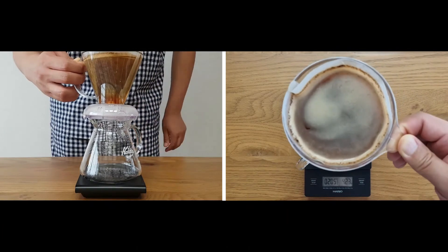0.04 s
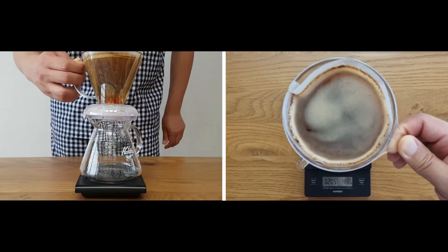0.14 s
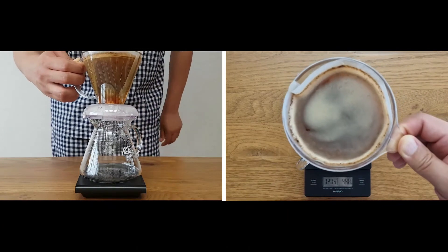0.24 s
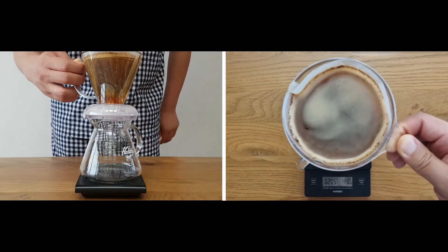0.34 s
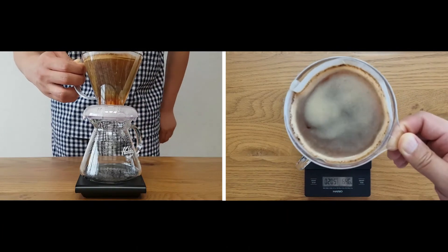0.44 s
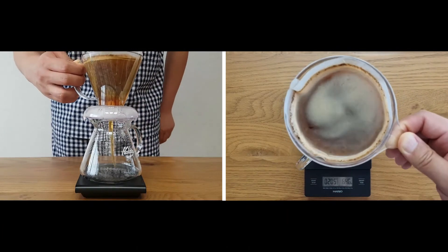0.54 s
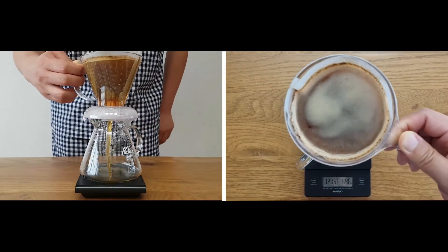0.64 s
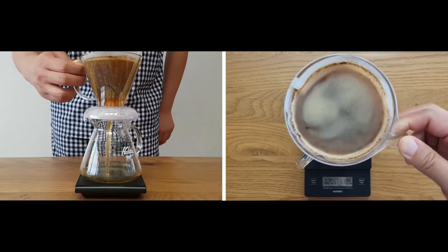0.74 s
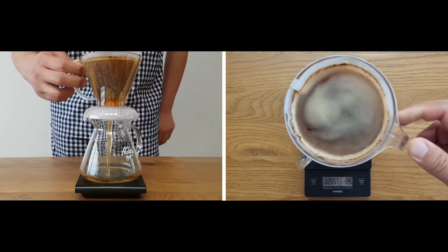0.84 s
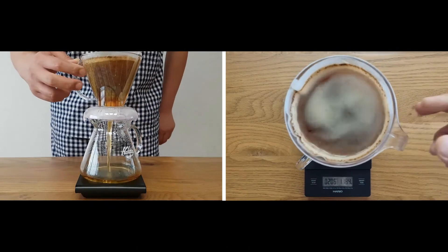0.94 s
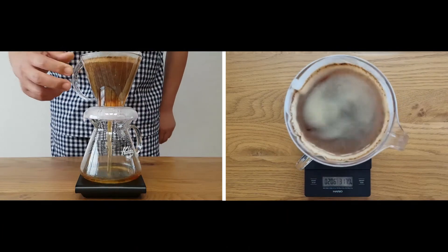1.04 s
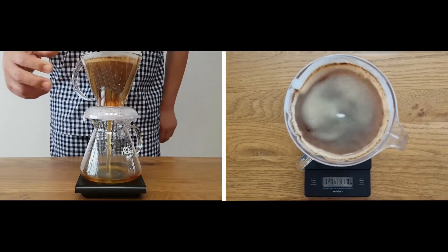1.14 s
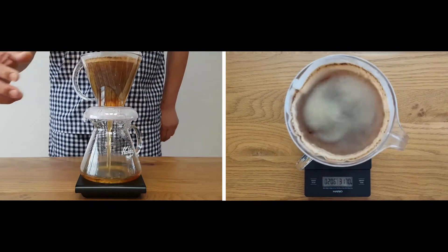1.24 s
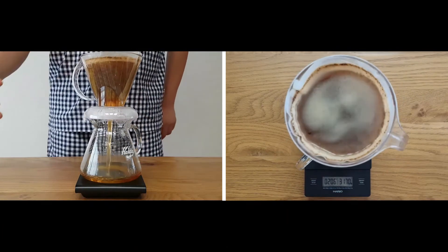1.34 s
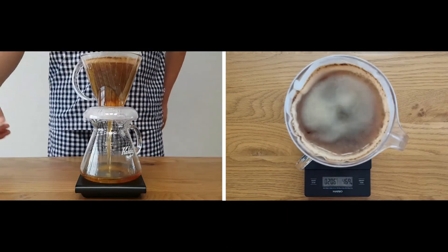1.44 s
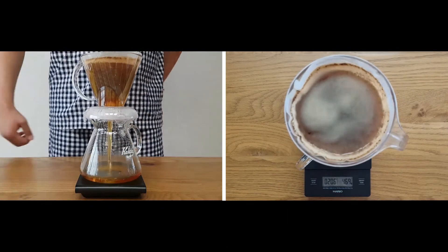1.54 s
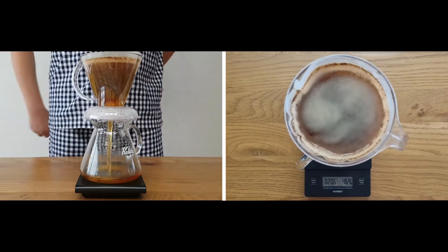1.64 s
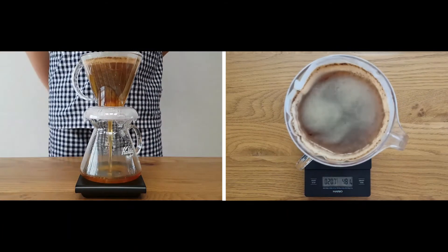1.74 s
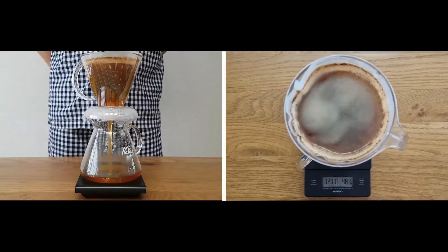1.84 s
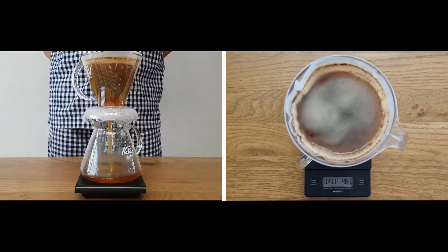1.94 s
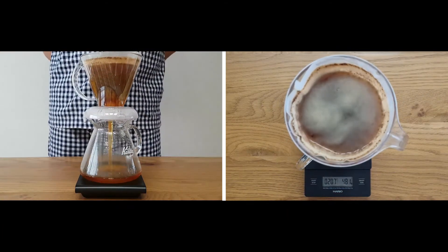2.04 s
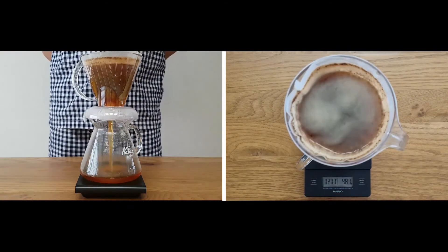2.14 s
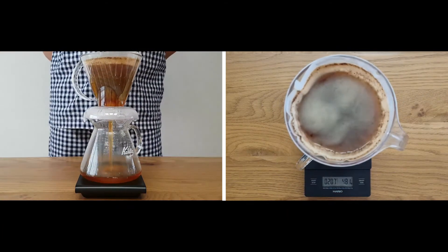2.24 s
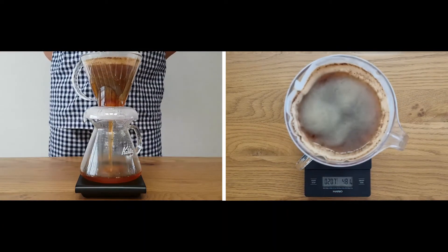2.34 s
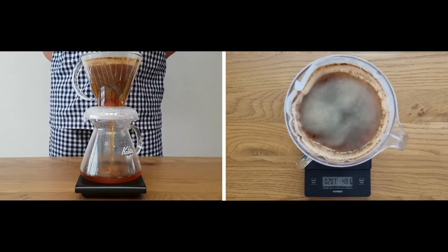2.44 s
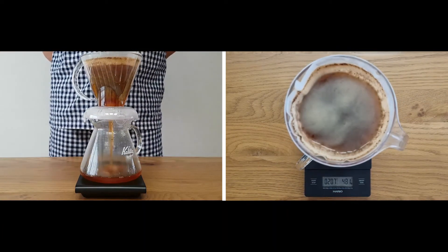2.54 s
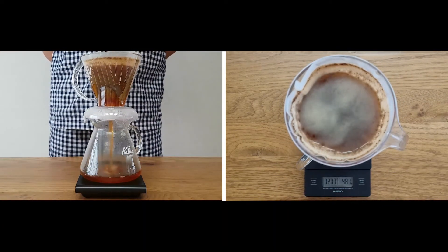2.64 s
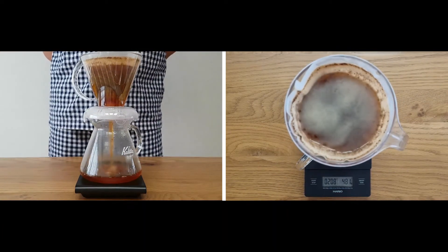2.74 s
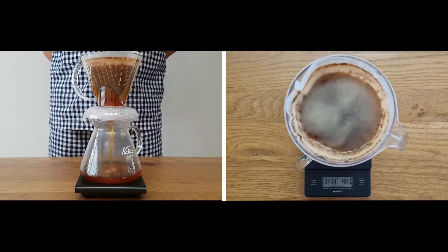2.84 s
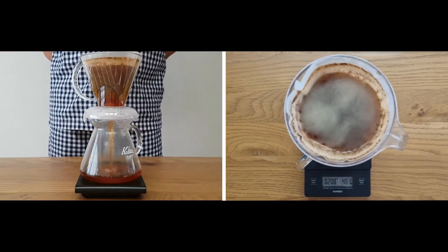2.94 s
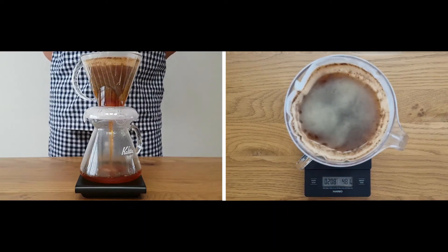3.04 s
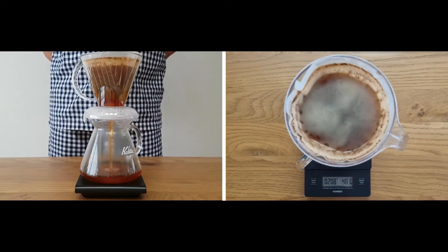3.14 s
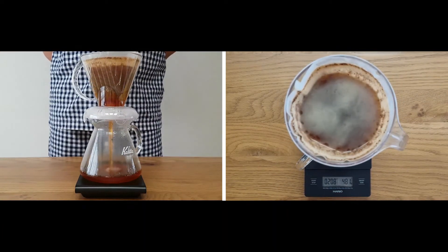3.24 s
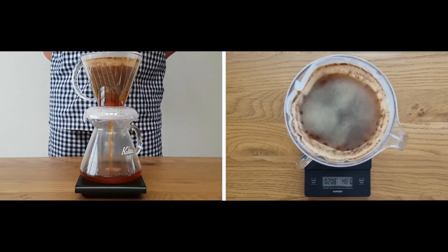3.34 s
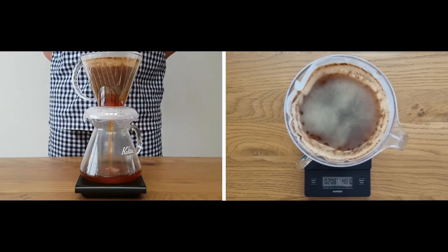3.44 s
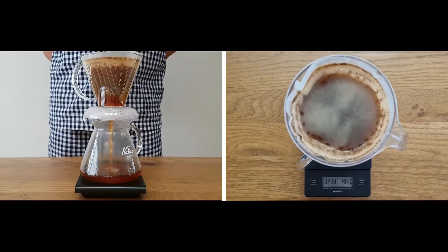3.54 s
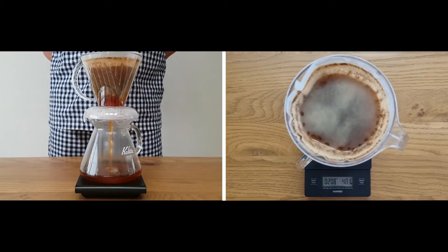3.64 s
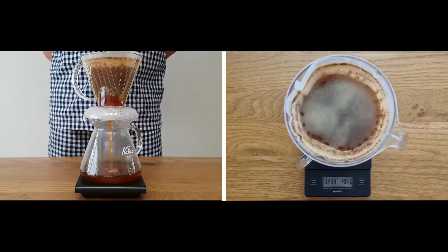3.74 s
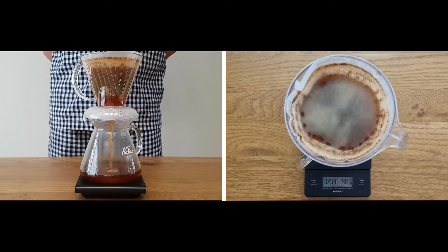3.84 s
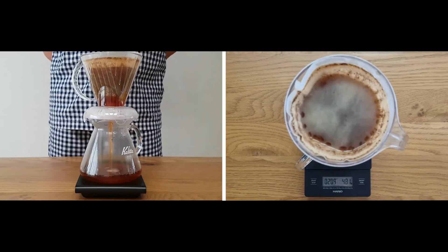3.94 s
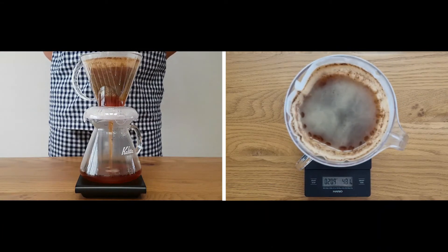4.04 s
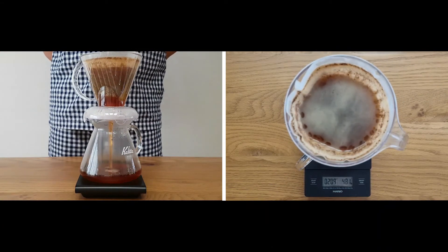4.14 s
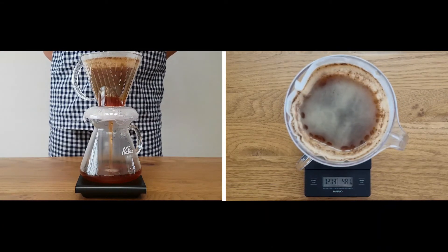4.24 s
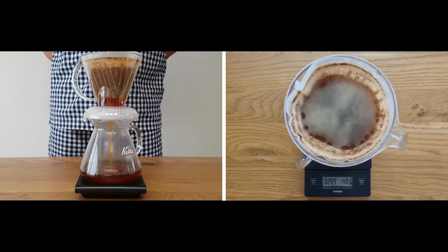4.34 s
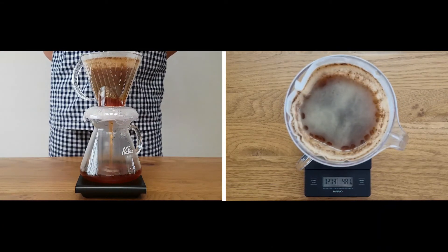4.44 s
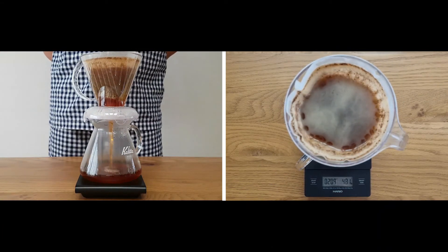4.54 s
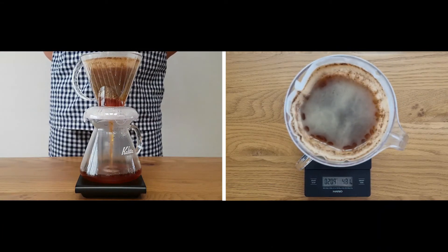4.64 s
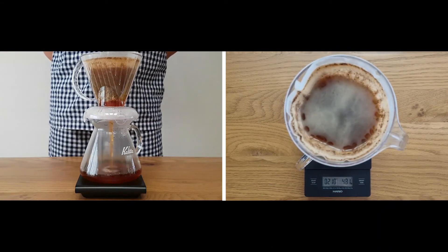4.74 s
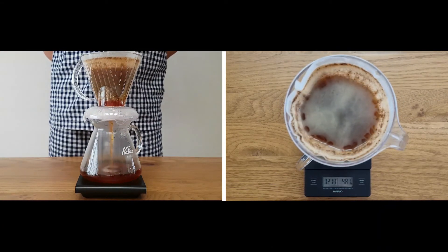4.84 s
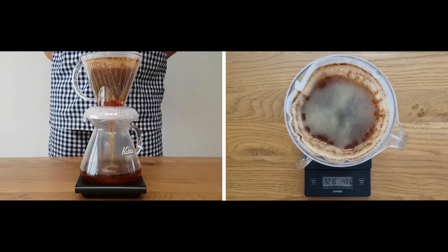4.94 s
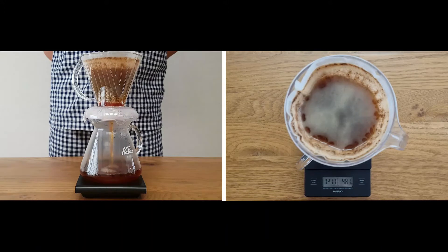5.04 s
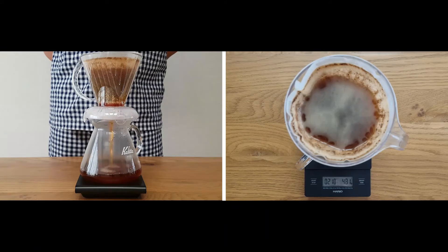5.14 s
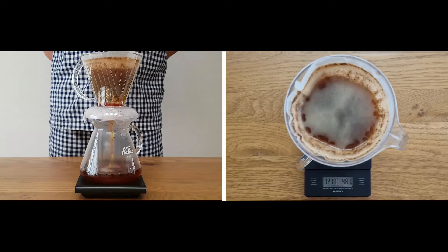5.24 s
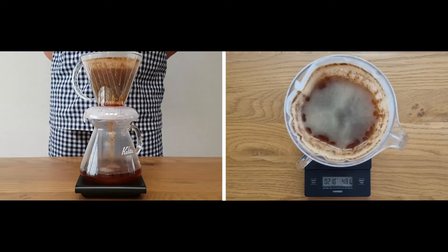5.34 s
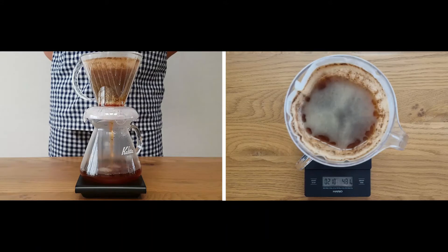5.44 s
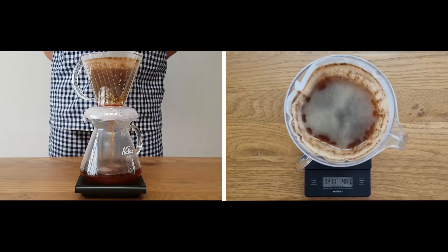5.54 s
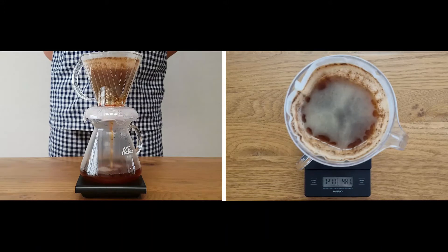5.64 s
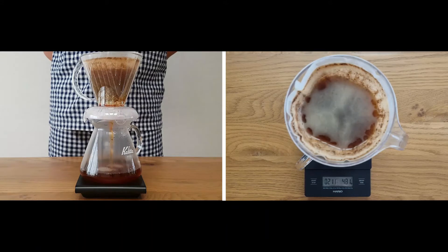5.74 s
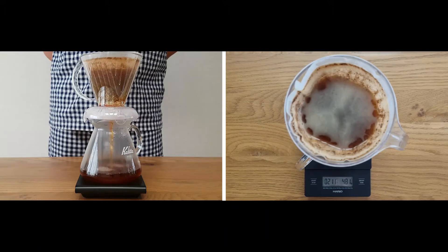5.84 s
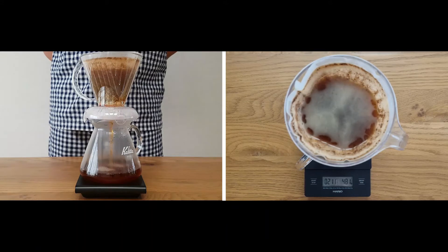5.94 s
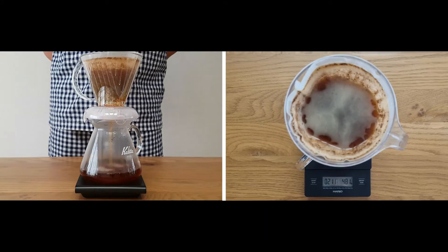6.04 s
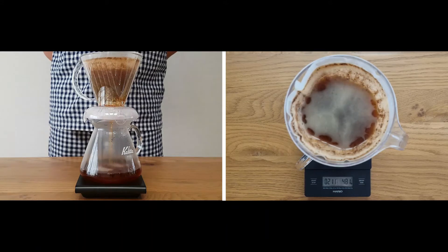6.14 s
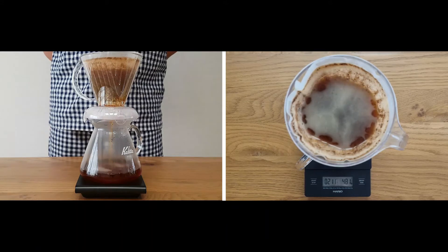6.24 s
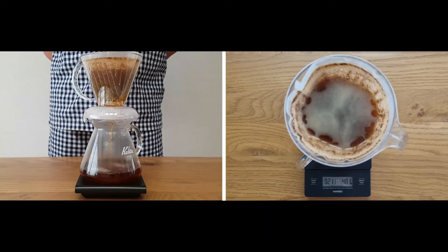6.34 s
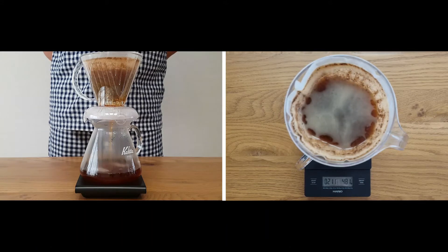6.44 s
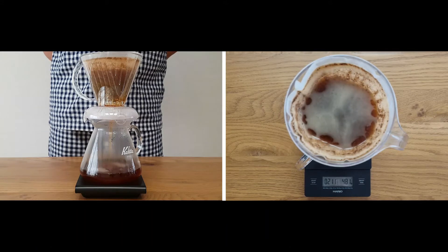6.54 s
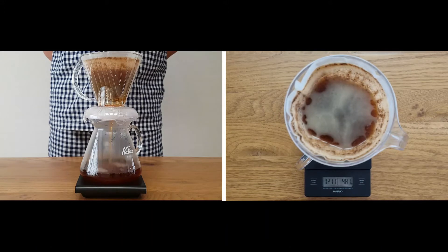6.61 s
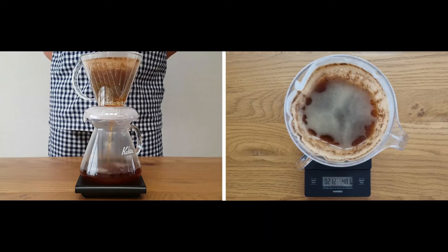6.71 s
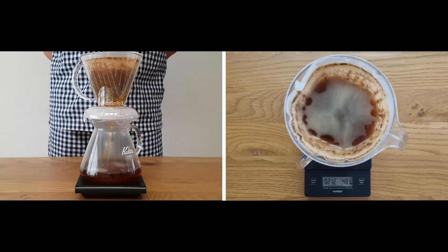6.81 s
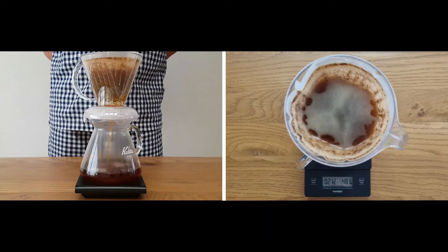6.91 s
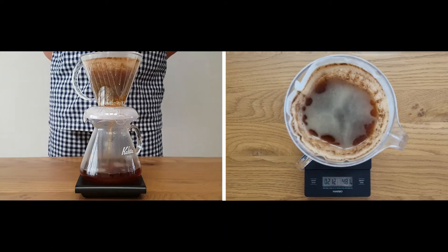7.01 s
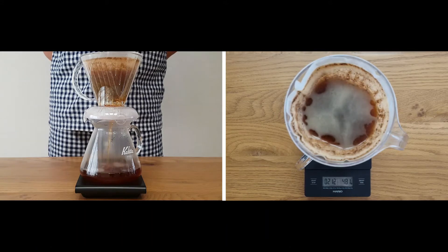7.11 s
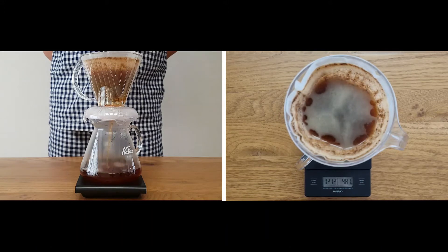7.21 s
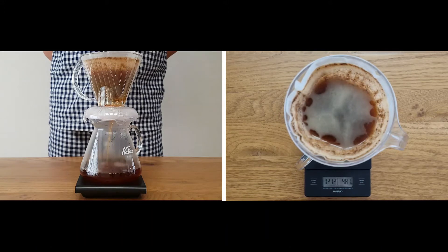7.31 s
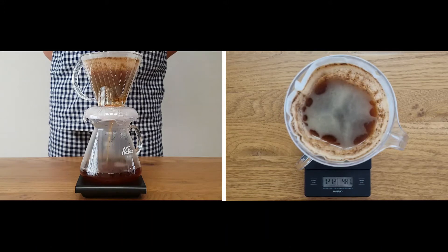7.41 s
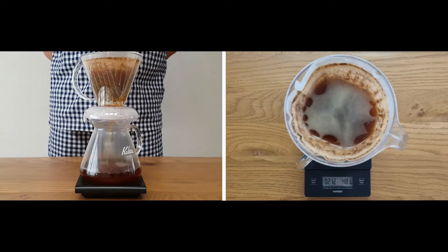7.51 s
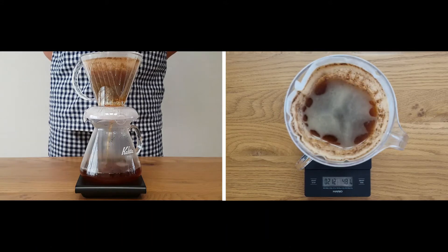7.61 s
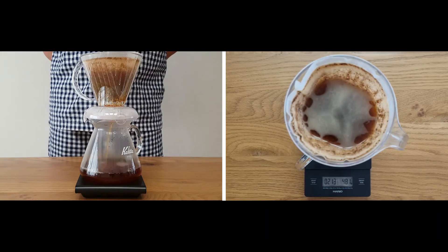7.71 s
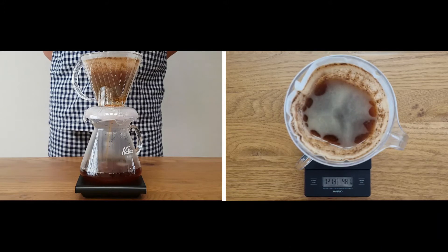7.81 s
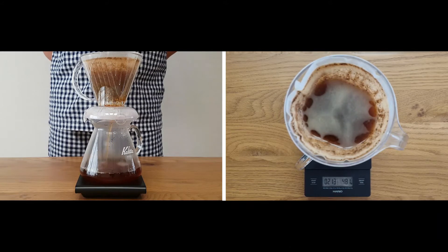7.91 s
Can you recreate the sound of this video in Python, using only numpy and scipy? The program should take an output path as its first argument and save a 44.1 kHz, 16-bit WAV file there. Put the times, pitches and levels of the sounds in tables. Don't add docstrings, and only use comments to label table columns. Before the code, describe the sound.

Close plastic-on-glass clunk and bounce, a short pause, then fine droplets patter on glass and deepen into steady, hollow, watery gurgling.

```python
import sys
import numpy as np
from scipy import signal
from scipy.fft import rfft, irfft
from scipy.io import wavfile

SR = 44100
rng = np.random.default_rng(int(sys.argv[2]) if len(sys.argv) > 2 else 0)


def file_out(sig):
    cols = np.atleast_2d(sig).T
    lim = np.clip(cols, -1, 1)
    pcm = np.round(lim * 32767).astype(np.int16)
    wavfile.write(sys.argv[1], SR, pcm)


def volts_from_decibels(level):
    exponent = np.asarray(level, float) / 20
    return 10 ** exponent


N = 351477

# start in seconds, peak in dB, radius in mm, overtone in dB.
BIG_BUBBLES = [(4.545, -34, 2.7, -23), (4.881, -40, 2.62, -34), (4.924, -36, 2.86, -20),
               (5.226, -34, 2.6, -13), (5.323, -39.5, 3, -20), (5.466, -37, 3.38, -12.5),
               (5.493, -40.5, 2.37, -18), (5.572, -42, 3.08, -23), (5.617, -30, 2.77, -19),
               (5.639, -31, 3.1, -25), (6.026, -43, 3.35, -23), (6.185, -32.5, 2.48, -14),
               (6.195, -30.5, 2.54, -18), (6.205, -33, 2.87, -20), (6.405, -35, 3.02, -19),
               (6.448, -27.5, 2.77, -29), (6.5, -36, 2.9, -22), (6.528, -35, 3.62, -9.5),
               (6.818, -33.5, 2.72, -25), (7.092, -38, 2.8, -18), (7.103, -43, 2.88, -16),
               (7.195, -38, 3.04, -17), (7.228, -30.5, 3.36, -4), (7.54, -31, 3.13, -12),
               (7.5787, -35.5, 2.84, -15), (7.616, -34.5, 2.66, -15), (7.643, -32, 3.36, -12),
               (7.666, -28.5, 3.52, -14), (7.719, -33.5, 2.8, -16), (7.774, -35, 3.75, -12)]
# start in seconds, peak in dB.
SOFT_BUBBLES = [(3.955, -61), (4.104, -45.5), (4.195, -42), (4.239, -49.5), (4.399, -43.5), (4.462, -44),
                (4.604, -43.5), (4.775, -52), (4.806, -42), (5.044, -44.5), (5.077, -41), (5.104, -49),
                (5.212, -43), (5.694, -38), (5.815, -40.5), (5.84, -40), (5.929, -40), (5.97, -38),
                (6.425, -39), (6.657, -39), (6.717, -73), (6.774, -42.5), (7.036, -41), (7.339, -44.5),
                (7.367, -40), (7.434, -43.5), (7.788, -39), (7.849, -47), (7.884, -43), (7.908, -41.5),
                (3.995, -57), (4.173, -57), (4.26, -46), (4.369, -56), (4.581, -45), (4.721, -51),
                (4.841, -47), (4.892, -49), (5.016, -52), (5.439, -45), (5.519, -49), (5.558, -47),
                (5.653, -36), (5.781, -50), (5.877, -44.5), (6.005, -43), (6.093, -52), (6.143, -66),
                (6.225, -42.5), (6.275, -59), (6.323, -59), (6.474, -42), (6.639, -58), (6.866, -65),
                (7.007, -48), (7.069, -59), (7.268, -40), (7.302, -42.5), (7.501, -60), (7.79, -42)]
# start in seconds, peak in dB, pitch in Hz.
SHALLOW_BUBBLES = [(2.002, -50, 2700), (1.6755, -51, 2080), (1.724, -48.5, 2570), (1.7885, -42.5, 2760),
                   (1.8692, -40.5, 2090), (1.904, -53, 1970), (1.9605, -54, 1880), (1.9892, -49, 1890),
                   (2.108, -54, 2880), (2.138, -58, 2780), (2.171, -60, 2770), (2.2455, -51.5, 1920),
                   (2.2781, -47.5, 1550), (2.139, -55, 1680), (2.3332, -48, 1660), (2.34, -50, 1670),
                   (2.378, -48.5, 2800), (2.401, -44.5, 1590), (2.469, -60, 1650), (2.531, -50, 1710),
                   (2.571, -60, 1930), (2.5835, -48.5, 2740), (2.6066, -50, 1660), (2.628, -58, 2560),
                   (2.643, -49.5, 2450), (2.7188, -59, 1880), (2.7307, -50, 1680), (2.7663, -47.5, 1700),
                   (2.7811, -43, 2490), (2.8226, -52, 1750), (2.872, -59, 1740), (2.9363, -59, 2400),
                   (2.973, -56, 1820), (3.024, -67, 1670), (3.0396, -64, 1150), (3.0992, -51, 1150),
                   (3.1639, -45.5, 1470), (3.2364, -52.5, 1790), (3.257, -52.5, 1070), (3.288, -56, 1110),
                   (3.328, -53, 2860), (3.3628, -53.5, 1070), (3.395, -63, 1150), (3.423, -62, 1110),
                   (3.443, -47.5, 1370), (3.5135, -68.5, 1300), (3.539, -53, 1240), (3.593, -58, 1160),
                   (3.7694, -62, 1470), (3.7897, -51, 1440), (3.8367, -57, 1200), (3.8644, -58, 1140),
                   (3.8986, -53, 1070), (3.929, -65, 1250), (3.957, -49, 1240)]
STAGES_S = np.linspace(1.2, 8, 14)
SOFT_OVERTONE_DB = -17.5


def rms_one(x):
    return x / np.sqrt(np.mean(x ** 2) + 1e-20)


def at_hz(points, hz):
    table_hz, table_db = np.array(points).T[:2]
    return np.interp(np.log(hz), np.log(table_hz), table_db)


def add(track, sound, s):
    i = max(round(s * SR), 0)
    track[i:i + len(sound)] += sound[:N - i]


def ring(clicks, hz, t60):
    r, w = volts_from_decibels(-60 / (t60 * SR)), 2 * np.pi * hz / SR
    return signal.lfilter([0, np.sin(w)], [1, -2 * r * np.cos(w), r * r], clicks + 1e-18)


def coloured(white, spectrum):
    hz = np.fft.rfftfreq(white.shape[-1], 1 / SR) + 1
    return rms_one(irfft(rfft(white) * volts_from_decibels(at_hz(spectrum, hz)), white.shape[-1]))


def set_down():
    # start in seconds, crack peak, glass ring and table thud in dB.
    touches = np.array([(0.001, -40, -81, -63), (0.059, -52, -71.5, -60), (0.108, -53, -77.5, -77),
                        (0.577, -45.5, -82, -53), (0.5936, -8.5, -26, -38), (0.606, -19, -42, -47),
                        (0.611, -20, -35.5, -41.5), (0.62, -19.5, -34.5, -35), (0.631, -36, -70, -48),
                        (0.646, -29, -56, -58), (0.699, -49, -73, -50), (0.781, -39, -61, -60),
                        (0.787, -35.5, -86, -83)])
    # pitch in Hz, level in dB, t60 in seconds.
    glass = [(1036, -4.5, 0.0427), (1140, 9, 0.029), (1250, -2, 0.055), (1390, 4, 0.039),
             (1497, -7.5, 0.27), (1543, -1, 0.12), (2130, -9, 0.14), (2080, -7, 0.3), (2454, 1.5, 0.18),
             (2489, -10, 0.2), (3635, -20, 0.12), (8127, -28, .25), (4570, -24.5, 0.41), (4990, -19, 0.25)]
    # pitch in Hz, level in dB, t60 in seconds.
    table = [(76, -13.5, 0.19), (122, -9, 0.11), (156.2, -15, 0.3), (262, -30, 0.081), (329, 1, 0.2),
             (417, 7.5, 0.017)]
    # frequency in Hz, level in dB per Hz.
    crack_spectrum = [(120, -64), (200, -14.5), (305, -1), (420, -10), (820, -15.5), (1100, -14),
                      (1500, -5), (1700, -8), (2470, -3), (3000, -14.5), (5300, -16.5), (6520, -23.5),
                      (8100, -16), (16000, -29)]
    start_s, crack_db, glass_db, table_db = touches.T
    at = np.round(start_s * SR).astype(int)
    cracks, rings = np.zeros(N), np.zeros(N)
    glass_edge = signal.butter(4, 1000, "high", fs=SR, output="sos")
    table_edge = signal.butter(2, 560, fs=SR, output="sos")
    for modes, blow_db, edge in ((glass, glass_db, glass_edge), (table, table_db, table_edge)):
        for hz, db, t60 in modes:
            clicks = np.zeros(3 * SR // 2)
            blows = volts_from_decibels(blow_db + db + rng.normal(0, 1.14, len(at)))
            clicks[at] = blows * rng.choice([-1, 1], len(at))
            add(rings, signal.sosfilt(edge, ring(clicks, hz, t60)), 0)
    t = np.arange(2048) / SR
    burst = (1 - np.exp(-t / 0.0075)) * np.exp(-t / 0.0077)
    noises = coloured(rng.standard_normal((len(touches), 2048)), crack_spectrum)
    for s, db, noise in zip(start_s, crack_db, noises):
        add(cracks, volts_from_decibels(db - 7.0) * burst * noise, s - .001)
    return signal.sosfilt(signal.butter(2, 50, "high", fs=SR, output="sos"), [cracks, rings])


def knocks(rows):
    out, t = np.zeros(N), np.arange(SR // 4) / SR
    for s, db, hz, t60 in rows:
        add(out, volts_from_decibels(db - 60 * t / t60) * (1 - np.exp(-t * hz)) * np.sin(2 * np.pi * hz * t), s)
    return out


def foot_knocks():
    # start in seconds, peak in dB, pitch in Hz, t60 in seconds.
    foot = [
        (0.054, -45.5, 413, 0.052),
        (0.003, -54, 510, 0.094),
        (0.056, -57, 1770, 0.03),
        (0.595, -52, 32, 0.27),
        (0.782, -34.5, 1160, 0.014),
        (0.782, -37, 1450, 0.024),
    ]
    return knocks(foot)


def after_ring():
    # pitch in Hz, peak in dB, t60 in seconds.
    clink = [(2420, -58, 0.34), (2410, -61, 0.88), (2040, -65, 0.31), (3860, -74.5, 0.48),
             (5100, -73, 0.36), (1250, -70, 0.42)]
    click = np.eye(1, SR)[0]
    ringing = sum(volts_from_decibels(db) * ring(click, hz, t60) for hz, db, t60 in clink)
    return np.pad(ringing, (0, N - SR))


def bubble(hz, cycles, rise):
    turns = np.arange(768) / SR * hz / cycles
    swell = (turns * np.exp(1 - turns)) ** 2.52
    return swell * np.sin(2 * np.pi * cycles * turns * (1 + rise * np.minimum(turns, 4) / 2))


def resonance(hz, width):
    r = np.exp(-np.pi * width / SR)
    zeros = np.array([1, 0, -1]) * (1 - r * r) / 2
    poles = [1, -2 * r * np.cos(2 * np.pi * hz / SR), r * r]
    return signal.lfilter(zeros, poles, np.eye(1, 4096)[0])


def depth(s):
    return np.array([np.interp(s, STAGES_S, stage) for stage in np.eye(len(STAGES_S))])


def server(direct_db):
    # pitch in Hz, width in Hz, level in dB when shallow, deep and full.
    body_modes = [(853, 100, -29, -24, -16.5), (1015, 5.2, -25, -19, -5), (1124, 29.8, -12, -3, 5.5),
                  (1240, 29, 0, -2.5, -0.5), (1465, 19, -16, -2.5, -7.5), (1637, 56, 2.5, -9, -9),
                  (1775, 34, -11, -4.5, 4), (2138, 51, -1, 0, -0.5), (2270, 36, -16, -11, 4.5),
                  (2700, 66, 6, -0.5, -5), (3150, 90, -21.5, -18, -22), (3500, 73, -24, -22, 7),
                  (4030, 32, -3.5, -32, 7), (4850, 54, -35, 2, 7.5), (5530, 59, -10, -5, -9),
                  (5410, 40, -19, -20, 11.5), (6400, 130, -41, -4, -19), (7160, 48, -30, -23, -14),
                  (8350, 75, -4, -20, 6), (9800, 120, -5, -0.5, -11), (10700, 70, -1.5, -1.5, -27),
                  (11450, 110, -8, -3, 3), (13500, 630, -21, -32, -23)]
    deepens_s = (2.43, 4.46, 9.8)
    # first and last pitch in Hz, time constant in seconds, width in Hz, first and last level in dB.
    shifting = [(8230, 6200, 2.25, 210, -2.5, -9.5), (4400, 4900, 2, 400, -1, -27),
                (11200, 9500, 2.5, 150, -8, -33), (2880, 2296, 1.24, 103, 4.5, -2)]
    fill = np.array([np.interp(STAGES_S, deepens_s, stage) for stage in np.eye(len(deepens_s))])
    out = volts_from_decibels(direct_db) * np.eye(1, 4096)
    for k, (hz, width, *db) in enumerate(body_modes):
        gains = (-1) ** k * (volts_from_decibels(np.array(db)) @ fill)
        out = out + gains[:, None] * resonance(hz, width)
    for first_hz, last_hz, tau, width, first_db, last_db in shifting:
        left = np.exp(-(STAGES_S - STAGES_S[0]) / tau)
        out = out + [volts_from_decibels(last_db + (first_db - last_db) * a)
                     * resonance(last_hz + (first_hz - last_hz) * a, width) for a in left]
    passing = volts_from_decibels(-1.5) * np.exp(-(STAGES_S - 2.85) ** 2 / 2)
    return out + passing[:, None] * resonance(5195, 73)


def drops(rows, cycles, rise, direct_db, splash_db):
    fizz_hz, fizz_scatter, fizz_spread = 8100, 0.6, 0.66
    surface_wander = 0.023
    out, stages = np.zeros(N), rfft(server(direct_db), 5120)
    fizz, t = rng.standard_normal((len(rows), 769)), np.arange(768) / SR
    burst = (1 - np.exp(-t / .0006)) * np.exp(-t / .003)
    log_hz = np.log(np.fft.rfftfreq(5120, 1 / SR) / fizz_hz + 1e-6)
    for (s, peak_db, hz, *over_db), hiss in zip(rows, fizz):
        body = depth(s) @ stages
        bins = np.arange(len(body))
        body = np.interp(bins * (1 + surface_wander * hiss[-1]), bins, body)
        patch = np.exp(-((log_hz - fizz_scatter * hiss[0]) / fizz_spread) ** 2 / 2)
        splash = rfft(volts_from_decibels(splash_db) * hiss[1:] * burst, 5120) * patch
        for k, db in enumerate([0, *over_db]):
            tone = rfft(bubble(hz * (1 + 1.05 * k), cycles, rise), 5120)
            part = irfft((tone + splash) * body)[:4864]
            add(out, volts_from_decibels(peak_db + db) * part / np.abs(part).max(), s - .001)
    return out


def soft_bubbles():
    radius_mm, growth_mm_per_s, scatter_mm = 2.695, 0.052, 0.15
    chance = rng.standard_normal(len(SOFT_BUBBLES))
    return [(s, db, radius_mm + growth_mm_per_s * (s - 4) + scatter_mm * a, SOFT_OVERTONE_DB)
            for (s, db), a in zip(SOFT_BUBBLES, chance)]


def slosh(rows):
    slosh_db, from_s = -35, 6.02
    kicks = np.zeros(N)
    for s, db, *_ in rows:
        add(kicks, volts_from_decibels([db + slosh_db]) * np.clip(s - from_s, 0, 1), s)
    soft = signal.sosfilt(signal.butter(2, [210, 480], "band", fs=SR, output="sos"), kicks) * 40
    return sum(ring(soft, hz, t60) / 15 for hz, t60 in ((260, 0.057), (390, 0.053)))


def deep_pool():
    # start in seconds, peak in dB, radius in mm.
    more_soft = [(3.931, -44, 5.4), (4.136, -45.5, 2.57), (5.307, -45, 2.6), (5.601, -41.5, 1.3),
                 (5.984, -45, 2.7), (6.771, -39, 4.06), (6.677, -40, 2.44), (6.916, -52, 2.1),
                 (6.972, -41, 2.66), (7.169, -46.5, 3.7), (7.245, -32.5, 2.65), (7.352, -41.5, 3.7),
                 (7.45, -49, 2.9), (7.517, -36, 2.22), (7.689, -37.5, 4.3), (7.733, -39, 5), (7.791, -36, 3.67),
                 (7.953, -51.5, 1.7)]
    minnaert_hz_mm = 3260
    smaller = [(*row, SOFT_OVERTONE_DB) for row in more_soft] + soft_bubbles()
    big, small = ([(s, db, minnaert_hz_mm / max(mm, 1), over_db) for s, db, mm, over_db in rows]
                  for rows in (BIG_BUBBLES, smaller))
    bubbles = drops(big, cycles=1.46, rise=0.023, direct_db=-20.0, splash_db=-29)
    bubbles = bubbles + drops(small, cycles=1.31, rise=0.049, direct_db=-25.5, splash_db=-34)
    return bubbles, slosh(big + small)


def shallow_pool():
    return drops(SHALLOW_BUBBLES, cycles=1.85, rise=0.0076, direct_db=-4.5, splash_db=-12)


def first_droplets():
    # start in seconds, peak in dB, pitch in Hz.
    spatter = [(1.2512, -62.5, 3880), (1.294, -53.5, 4050), (1.321, -58, 3850), (1.4382, -54, 4030),
               (1.4707, -47.5, 4460), (1.5077, -49, 5640), (1.5371, -50, 6860), (1.5371, -42, 4970),
               (1.577, -58, 4030), (1.6269, -55, 4730), (1.6503, -48, 8350), (1.69, -57, 4300),
               (1.85, -52, 4400), (1.784, -49, 4540), (1.7978, -44, 4300), (1.8343, -53, 4300),
               (1.908, -53, 4100), (1.99, -55, 4530), (2.094, -52.5, 7650), (2.1088, -47.5, 4600),
               (2.1723, -50.5, 3000), (2.2108, -50.5, 4170), (2.268, -55, 4500), (2.3228, -55, 7440),
               (2.3407, -56, 4300), (2.3766, -49, 4270), (2.4181, -46.5, 2970), (2.4542, -53, 4070),
               (2.4795, -52.5, 3280), (2.049, -51, 4400), (2.5622, -58, 7280), (2.5697, -55, 4690),
               (2.581, -55, 7150), (1.809, -48, 4470), (2.644, -55, 4030), (2.671, -53.5, 11200),
               (2.7, -56, 5260), (2.7185, -55, 4150), (2.7682, -41, 7500), (2.7818, -44, 4170)]
    return drops(spatter, cycles=4.0, rise=0.018, direct_db=-17.5, splash_db=-3.5)


def splashes():
    # start in seconds, peak in dB, pitch in Hz.
    falling = [(3.0963, -71, 5150), (3.321, -56, 5150), (3.7867, -50.5, 5260), (3.9558, -73, 3830),
               (4.0703, -50.5, 10350), (4.1394, -56, 8100), (4.2073, -54, 5300), (4.5295, -67, 3500),
               (4.5425, -51.5, 4960), (4.561, -47, 9800), (4.5832, -46, 6240), (4.667, -48, 5000),
               (4.6976, -53, 6400), (4.8308, -58, 4970), (4.88, -51.5, 5800), (4.9247, -57, 4640),
               (4.9965, -54, 7140), (5.1701, -59, 6600), (5.209, -50.5, 5870), (5.2948, -58, 5430),
               (5.314, -46.5, 11200), (5.3357, -57, 5600), (5.401, -64, 6540), (5.427, -50, 6700),
               (5.5183, -52.5, 6330), (5.5996, -56, 11200), (5.6989, -58, 6360), (5.9697, -68, 6300),
               (6.0256, -50, 5830), (6.3494, -58.5, 4770), (6.445, -82, 11200), (6.502, -60, 4960),
               (6.6072, -60, 5100), (6.6757, -58, 3500), (6.89, -64, 4990), (6.9108, -50.5, 6400),
               (6.972, -46, 7050), (7.2086, -56.5, 5410), (7.2273, -51, 8230), (7.3242, -59, 9800),
               (7.338, -52, 6700), (7.414, -58, 4230), (7.452, -58, 4740), (7.537, -40.5, 7960),
               (7.5801, -67, 5530), (7.6165, -60, 4670), (7.652, -52.5, 4570), (7.721, -54, 8100),
               (7.7736, -65, 4800), (7.9087, -53, 4000)]
    return drops(falling, cycles=2.14, rise=0.0082, direct_db=-8.5, splash_db=-4.5)


def mist():
    # start in seconds, peak in dB, pitch in Hz.
    finest = [(1.4373, -50, 10700), (1.4837, -49, 10900), (1.5271, -54, 9130), (1.6508, -48, 10700),
              (1.7316, -52, 10700), (1.8404, -55, 10800), (1.9077, -50.5, 11100), (1.988, -50, 10000),
              (2.0404, -53, 10700), (2.2804, -55, 10900), (2.3996, -49, 10800), (2.4789, -57, 11200),
              (2.4979, -59, 11200), (2.5612, -68, 11800), (2.67, -56, 10900), (2.7174, -50.5, 10800),
              (2.7663, -65, 10700), (3.4497, -58, 10900), (3.6248, -57, 10700), (3.786, -56, 10200),
              (3.995, -57, 10600), (4.0693, -64, 10300), (4.1396, -59, 10700), (4.5432, -66, 9070),
              (4.5602, -53, 10200), (4.9234, -52.5, 10300), (5.0391, -57, 10900), (5.1708, -56.5, 10500),
              (5.3135, -65, 11300), (5.3434, -53, 14800), (5.3993, -55.5, 10500), (5.5998, -60, 11200),
              (5.6722, -54, 9960), (5.97, -53.5, 13600), (6.0264, -56, 15200), (6.2219, -62, 12900),
              (6.4464, -66, 11200), (6.9153, -64, 9800), (6.9717, -57, 11300), (7.2261, -48, 9900),
              (7.3244, -67, 9800), (7.4142, -56, 11400), (7.5354, -50.5, 11400), (7.5798, -56, 12500),
              (7.7734, -54, 12700)]
    return drops(finest, cycles=2.9, rise=0.011, direct_db=-8.0, splash_db=0.5)


def wall_pings():
    # start in seconds, peak in dB, pitch in Hz, t60 in seconds.
    pings = [
        (0.73, -64, 3880, .1),
        (6.68, -55, 3500, 0.043),
        (7.452, -56.5, 4670, 0.066),
        (7.911, -62.5, 3940, 0.1),
        (7.35, -67, 5900, 0.059),
    ]
    return knocks(pings)


def stirring():
    kicks = np.zeros(N)
    for s, *_ in BIG_BUBBLES + SOFT_BUBBLES + SHALLOW_BUBBLES:
        add(kicks, np.ones(1), s)
    return 0.58 + signal.lfilter([1], [1, -np.exp(-1 / (0.011 * SR))], kicks)


def grains(per_s, low_hz, high_hz, typical_hz, spread, cycles, direct_db):
    slow = signal.sosfilt(signal.butter(2, 25, fs=SR, output="sos"), rng.standard_normal(N))
    clumps = volts_from_decibels(4.0 * rms_one(slow))
    at = np.flatnonzero(rng.random(N) < per_s * clumps / SR)
    size, sign, pitch = rng.random((3, N))[:, at]
    kinds, kind = np.geomspace(low_hz, high_hz, 12), (pitch * 12).astype(int)
    shapes = [bubble(hz, cycles, 0.0076) + 0.33 * bubble(1.89 * hz, cycles, 0.013) * (hz < 1500)
              for hz in kinds]
    likely = np.exp(-(np.log(kinds[kind] / typical_hz[at]) / spread) ** 2 / 2)
    gains = volts_from_decibels(-3.0 * np.log(np.maximum(size, .03))) * np.sign(sign - .5) * likely
    out, heard = np.zeros(N), np.zeros(N)
    for i, k, gain in zip(at, kind, gains):
        out[i:i + 768] += gain * shapes[k][:N - i]
    for share, body in zip(depth(np.arange(N) / SR), server(direct_db)):
        span = np.flatnonzero(share)
        add(heard, signal.oaconvolve((out * share)[span], body), span[0] / SR)
    return rms_one(heard)


def stream():
    # start in seconds, air churned into the pool in dB, break-up into drops in dB.
    flow = [(1.15, -90.5, -88.5), (1.42, -83, -81), (1.75, -71, -73), (1.9, -66, -71), (2.8, -63, -101),
            (3.05, -79, -67), (3.6, -71, -67), (4.0, -65.5, -77.5), (4.6, -60, -66), (5.3, -58, -92),
            (5.9, -56.5, -100), (6.898, -57.5, -75), (7.4, -62.5, -75), (7.7, -58.5, -68.5),
            (7.97, -54.5, -67)]
    s, *columns = np.transpose(flow)
    t = np.arange(N) / SR
    small_db, patter_db = (np.interp(t, s, c) for c in columns)
    shallow_hz, deep_hz, sinks_from_s, sink_time_s = 2280, 1070, 1.85, 1.25
    small_hz = deep_hz + (shallow_hz - deep_hz) * np.exp(-np.maximum(t - sinks_from_s, 0) / sink_time_s)
    since, peak_db, rest_db = t - 1.51, -65, -79.5
    rise_db_per_s, fall_db_per_s = 38, 5.5
    falling_db = np.maximum(peak_db - fall_db_per_s * since, rest_db)
    spray_db = np.minimum(peak_db + rise_db_per_s * since, falling_db)
    first_hz, settled_hz, settles_s, climb_hz_per_s = 8600, 4300, 0.24, 1240
    spray_hz = settled_hz + (first_hz - settled_hz) * np.exp(-np.maximum(since, 0) / settles_s)
    spray_hz = spray_hz + climb_hz_per_s * since
    restless = stirring()
    small = grains(300, 794, 2760, small_hz, spread=0.23, cycles=1.57, direct_db=-15.5)
    patter = grains(190, 825, 3540, 2100 + 0 * t, spread=0.47, cycles=0.53, direct_db=2)
    spray = grains(1100, 3150, 15000, spray_hz, spread=0.75, cycles=3.5, direct_db=-14.5)
    pool = restless * (volts_from_decibels(small_db) * small + volts_from_decibels(spray_db) * spray)
    return (pool + volts_from_decibels(patter_db) * patter) * (t > s[0])


def kitchen(x):
    t60_s, treble_t60_s, wall_cut_hz = 0.63, .42, 8000
    t = np.arange(int(.9 * SR)) / SR
    mid, side = rng.standard_normal((2, len(t)))
    echoes = (mid + 0.45 * side * [[1], [-1]]) * (1 - np.exp(-t / 0.0008))
    dull = signal.sosfilt(signal.butter(2, wall_cut_hz, fs=SR, output="sos"), echoes)
    tail = dull * volts_from_decibels(-60 * t / t60_s) + (echoes - dull) * volts_from_decibels(-60 * t / treble_t60_s)
    return signal.fftconvolve(x[None], tail / np.sqrt(np.sum(tail ** 2) / 2), axes=1)[:, :N]


def room_tone():
    # frequency in Hz, level in dB per Hz.
    air = [(13, -55.5), (24, -25.5), (49, -6.5), (87, -5), (286, -5), (319, -4.5), (409, -9), (457, 1),
           (496, -9.5), (837, -16), (1070, -17), (7000, -28.5), (12000, -30), (17000, -30)]
    # frequency in Hz, correlation from 0 to 1.
    likeness = [(30, 1), (125, 0.93), (500, 0.87), (3000, 0.8), (8000, 0.58), (14000, 0.74)]
    # pitch in Hz, level in dB rms, end of the fade in seconds.
    hum = [(59.4, -78, 11), (131, -78, 8.4), (446, -78, 4)]
    out, edges, white = 0, 20 * 2 ** np.arange(0, 10, .5), rng.standard_normal((2, 2, N))
    for k, (low, high) in enumerate(zip(edges, edges[1:])):
        band = signal.butter(2, [low, high], "band", fs=SR, output="sos")
        mid, side = signal.sosfilt(band, white[k % 2])
        hz = np.sqrt(low * high)
        alike = np.clip(at_hz(likeness, hz), -1, 1)
        pair = np.sqrt(1 + alike) * mid + np.sqrt(1 - alike) * side * [[1], [-1]]
        out = out + volts_from_decibels(at_hz(air, hz)) * pair
    t = np.arange(N) / SR
    lines = sum(volts_from_decibels(db) * np.sqrt(2) * np.sin(2 * np.pi * hz * t) * np.clip(end - t, 0, 1)
                for hz, db, end in hum)
    return volts_from_decibels(-66.5) * rms_one(out) + lines


def scene():
    cracks, rings = set_down()
    cracks = cracks + foot_knocks()
    bubbles, thumps = deep_pool()
    coffee = bubbles + shallow_pool() + first_droplets() + splashes() + stream()
    neck = signal.butter(6, 876, "high", fs=SR, output="sos")
    coffee = signal.sosfilt(neck, coffee) + thumps
    echoes = volts_from_decibels(-4) * kitchen(volts_from_decibels(0.5) * cracks + volts_from_decibels(-9.0) * rings + volts_from_decibels(-7.5) * coffee)
    near = cracks + rings + after_ring() + wall_pings() + coffee + mist()
    balance = volts_from_decibels(np.array([[.2], [-.2]]))
    return (near + echoes) * balance + room_tone()


def band_limit(x):
    return signal.sosfilt(signal.butter(12, 15830, fs=SR, output="sos"), x)


def record(dry):
    top_cut = signal.cheby2(16, 30, 16100, fs=SR, output="sos")
    return band_limit(signal.sosfilt(top_cut, dry))


dry = scene()
out = record(dry)
file_out(out)
```